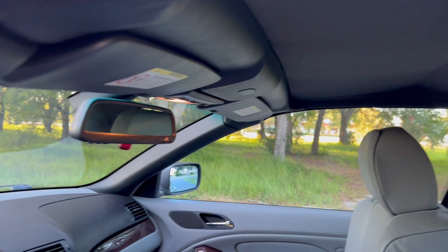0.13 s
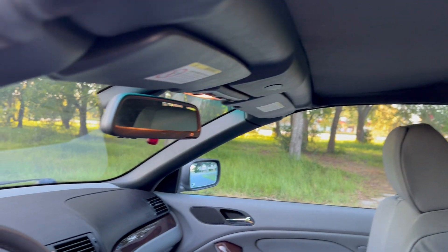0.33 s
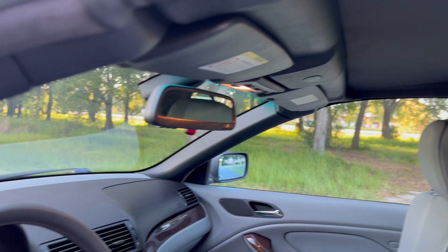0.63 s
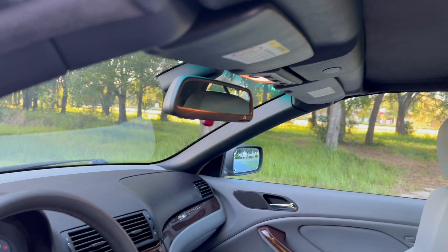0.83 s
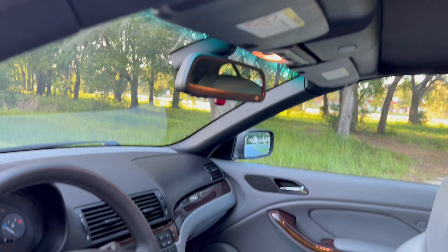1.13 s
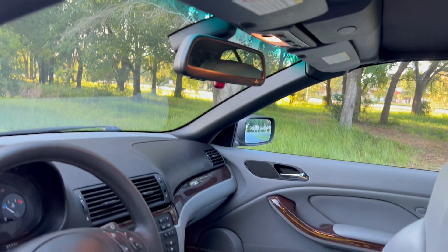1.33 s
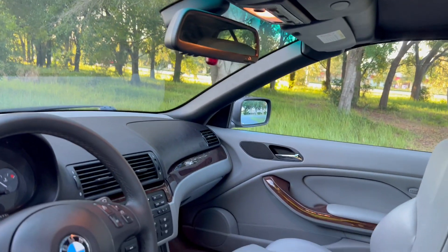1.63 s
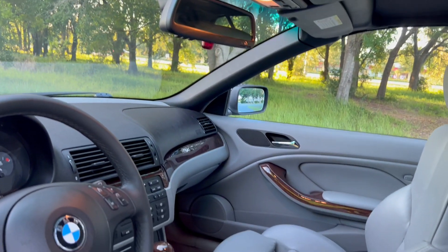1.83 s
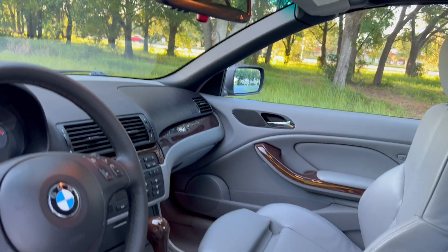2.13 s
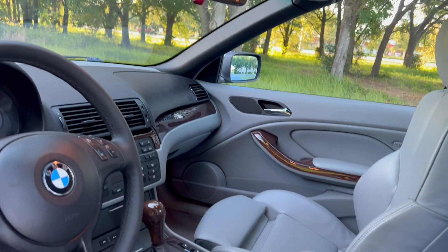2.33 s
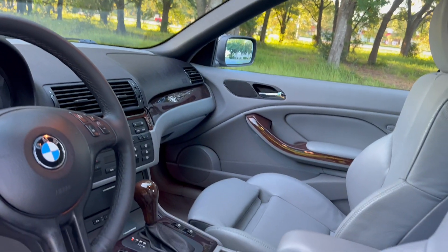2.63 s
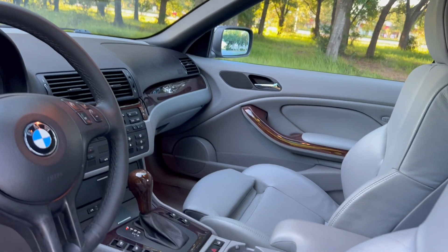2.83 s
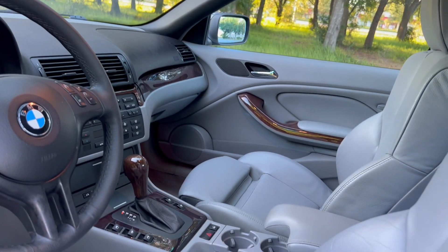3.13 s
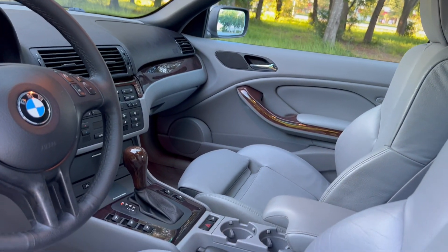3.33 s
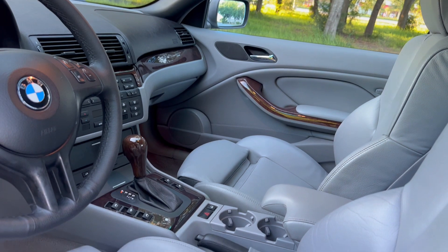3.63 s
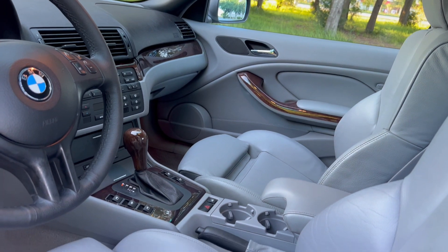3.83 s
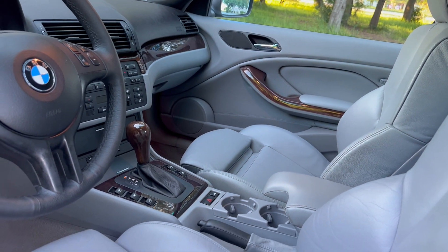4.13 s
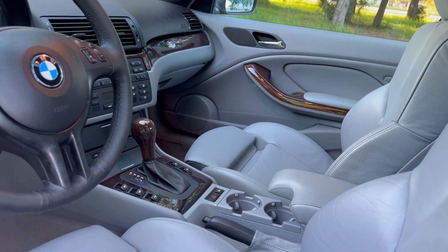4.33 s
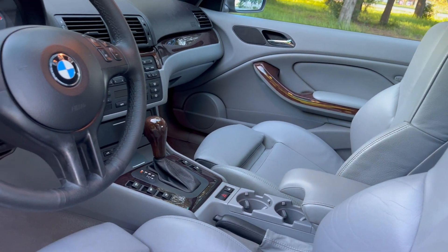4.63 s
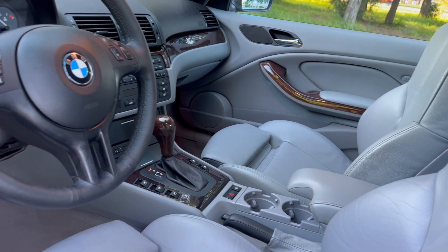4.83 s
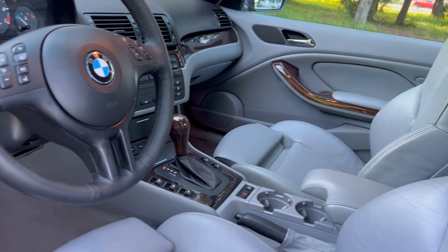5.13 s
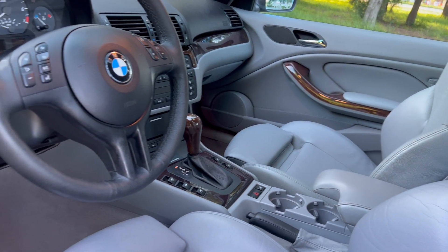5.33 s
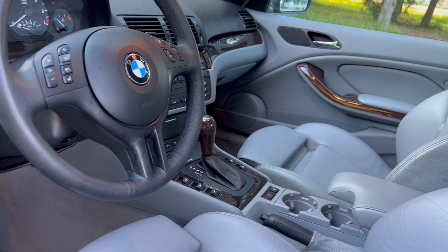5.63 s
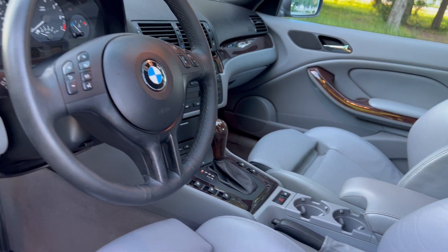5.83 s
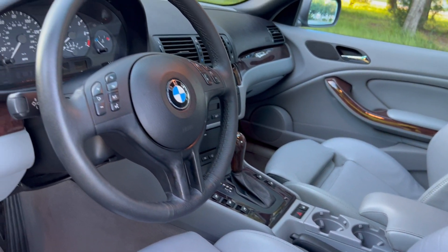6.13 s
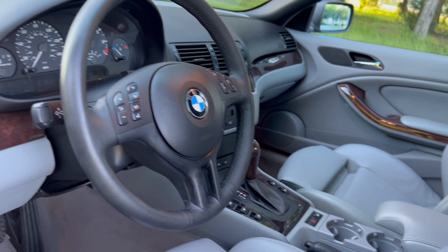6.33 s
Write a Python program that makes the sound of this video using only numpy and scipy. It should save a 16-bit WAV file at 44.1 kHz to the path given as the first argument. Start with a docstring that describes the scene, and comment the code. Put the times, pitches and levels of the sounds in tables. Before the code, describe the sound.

A handheld stereo microphone moves from a car's open door into the cabin. Wind first thumps on it in low lumps, with one dull falling jolt near one second. The engine idles steadily, its hum growing to a deep boom, over soft rumble and buzzing panels. Cicadas shimmer outside under trees. Faint plastic ticks come midway, and a last gust hits at the end.

```python
"""A car idles under trees with its door open; a handheld microphone starts at the door, cicadas singing outside.
In the first second and a half air buffets the ports in lumps of low noise, with one jolt that falls in pitch.
Trim ticks faintly as rings from 2.5 s; at about 3.4 s one near cicada, a filtered click cycle, gives way to another.
Deeper in the cabin the engine orders, sines on a slowing cycle, boom over coloured rumble and buzzing panels.
Just before the end one more gust strikes the ports."""
import sys
import numpy as np
from scipy import signal
from scipy.fft import rfft, irfft
from scipy.io import wavfile
from scipy.ndimage import uniform_filter1d, map_coordinates

SR = 44100
rng = np.random.default_rng(int(sys.argv[2]) if len(sys.argv) > 2 else 0)


def invert_db(level):
    """Linear amplitude ratio for a level in decibels (20 dB per decade), elementwise."""
    return 10 ** (np.asarray(level, dtype=float) / 20)


def inscribe(sig):
    """Save sig as 16-bit PCM at rate SR to the path in sys.argv[1].

    A 1-D sig is mono; a 2-D sig holds one channel per row.
    Samples are clipped to [-1, 1] before scaling.
    """
    pcm = np.round(np.clip(np.atleast_2d(sig).T, -1, 1) * 32767)
    wavfile.write(sys.argv[1], SR, pcm.astype(np.int16))


N = 286209
TIME = np.arange(N) / SR
HZ = np.maximum(np.fft.rfftfreq(N + 1, 1 / SR), 1)

# far cicadas: t/s, level/dB of the low, high and top bands (before panning)
CHORUS_LEVELS = [(0, -63, -55, -56.5), (.75, -62, -53.5, -53.5), (1.15, -62.5, -54.5, -56.5),
                 (2.7, -62.5, -57.5, -64), (3.63, -57, -56.5, -63), (4.3, -59, -56, -63.5),
                 (4.8, -57, -54.5, -61), (6.49, -57.5, -52, -57)]
# colours of the three bands of far song: f/Hz, relative level/dB per Hz
LOW_SONG = [(3800, -12.5), (4300, -10), (4800, 0), (5300, -2.5), (5700, -13), (6200, -8.5), (7200, -15),
            (8000, -26.5)]
HIGH_SONG = [(7000, -29), (7700, -14.5), (8600, -0.5), (9600, 2.5), (10300, 1), (10800, -16), (11500, -42)]
TOP_SONG = [(10000, -30), (10700, -2), (12000, -2), (12800, -8), (14500, 1.5), (15300, -5), (16000, -34)]
# two near cicadas: t/s, 33rd harmonic of the click cycle f/Hz, level/dB of lower and upper song (before the paths)
NEAR_CICADAS = [
    [(0, 5045, -65, -58), (.35, 5035, -66, -56), (.75, 5058, -57.5, -53), (1.25, 5056, -69, -61),
     (1.9, 5052, -70, -65), (2.35, 5040, -65.5, -67), (2.8, 4965, -64.5, -74), (3.3, 4945, -67.5, -76)],
    [(3.5, 5230, -64.5, -70), (3.7, 5190, -61, -68), (4.3, 5178, -62, -71), (4.65, 5190, -68, -74),
     (4.9, 5205, -62.5, -70), (5.5, 5250, -62.5, -60), (6.49, 5268, -65, -60)],
]
# resonances of a cicada's body, lower and upper song: f/Hz, width/Hz, relative level/dB
LOWER_BODY = [(5200, 600, 0), (6150, 300, -16)]
UPPER_BODY = [(9800, 1300, 0), (11700, 1200, -9), (13500, 1200, -10), (14500, 800, -14)]
# gusts of air on the ports: start t/s, length/s, level/dB while held
GUSTS = [(.02, .03, -41), (0.085, 0.38, -33.5), (0.588, .17, -27.5), (0.824, 0.19, -23.5),
         (1.124, 0.091, -29.5), (1.22, 0.19, -39), (6.41, .1, -22.5)]
GUST_RISE_S, GUST_FALL_S = 0.027, 0.029   # linear rise, time constant of the fall
# colour of the buffeting: f/Hz, relative level/dB per Hz
BUFFET_COLOUR = [(20, -37), (32, -35), (48, 7), (75, 2), (150, -14.5), (260, -17.5), (500, -62)]
# one jolt on the ports: level/dB before rise and decay, from f/Hz, towards f/Hz, decay/s
JOLT = (-14.5, 210, 60, 0.02)
JOLT_START_S = 1.1035
# faint ticks of trim: t/s, starting level/dB of the lower mode, its f/Hz, decay/s
TRIM_TICKS = [(2.506, -40, 1500, .0012), (2.652, -43, 1100, .008), (2.815, -53, 2500, .004),
              (4.6945, -45, 2900, .0015), (4.746, -46, 3200, .002)]
# place of the microphone: t/s, depth in the cabin (0-1), engine noise level/dB before the colour gains,
# left over right level/dB of the engine orders
PLACE = [(0, 0.1, -54.5, -2), (.8, 0.02, -51.5, 2), (1.6, 0.4, -53, 1), (2.6, .1, -54, 1),
         (3.5, 0.53, -51, 1.5), (4.3, 0.64, -49, .5), (4.5, 0.76, -46, 0.5), (5.2, 0.92, -45.5, 1),
         (6, 0.92, -43, 3.5), (6.49, 0.9, -44, 4)]
LAG_AT_DOOR_S, LAG_IN_CABIN_S = -0.00045, 0.00031   # how late the car reaches the left port at depth 0 and 1
# panels that buzz: f/Hz at the door, f/Hz in the cabin, corner/Hz of the noise about it,
# level/dB at the door, level/dB in the cabin (before panning)
BUZZING_PANELS = [(1099, 1330, 59, -56, -65), (967, 890, 68, -60.5, -56.5), (2454, 2600, 330, -67, -58),
                  (722, 700, 14.3, -63.5, -57.5), (1528, 1520, 20, -77.5, -64)]
# colours of the engine noise at the door and deep in the cabin: f/Hz, relative level/dB per Hz
NOISE_AT_DOOR = [(18, -33), (30, -9.5), (60, -1.5), (111, -5), (175, -5.5), (216, -13.5), (250, -14),
                 (371, -13.5), (466, -21), (887, -23.5), (1090, -19.5), (1340, -29), (2510, -35.5),
                 (3210, -42.5), (4300, -39.5), (5590, -59), (9460, -120)]
NOISE_IN_CABIN = [(18, -61), (30, -20), (60, -3.5), (102, -7.5), (128, -2.5), (158, 4), (183, -16.5),
                  (245, -24.5), (295, -12), (447, -22.5), (623, -26), (691, -26), (1370, -40.5),
                  (2510, -30), (4300, -45), (5590, -90), (9460, -120)]
DOOR_NOISE_DB, CABIN_NOISE_DB = 14, 9   # gain of each colour
# how alike the engine noise is at the two ports: f/Hz, left-right likeness (0-1)
NOISE_LIKENESS = [(60, 0.63), (200, 0.56), (400, 0.36), (600, 0), (1200, 0.035), (2400, 0), (4000, 0)]
# the idle slowly settles: t/s, engine cycles per s
IDLE_SPEED = [(0, 20.65), (.9, 20.62), (1.7, 20.25), (2.4, 20.1), (3.8, 19.93), (4.8, 19.77), (5.5, 19.47),
              (6.49, 19.3)]
# the two booming orders, in multiples of the engine cycle
LOUD_ORDERS = (8, 10)
# they swell and sink across the cabin's standing waves: t/s, level/dB of order 8, of order 10 (before panning)
LOUD_LEVELS = [(0, -44, -49), (.7, -36, -44), (1.3, -44, -44), (2, -37, -40.5), (2.5, -37.5, -41.5),
               (3.2, -31.5, -38.5), (3.65, -33, -35.5), (4.25, -26.5, -37.5), (4.7, -28, -44),
               (5.2, -23.5, -37.5), (5.45, -23.5, -38.5), (5.7, -22.5, -36), (6, -26.5, -40.5),
               (6.25, -23.5, -37), (6.49, -23.5, -49)]
# the fainter orders, in multiples of the engine cycle
FAINT_ORDERS = (3, 5, 7, 13, 15, 16, 18, 21, 36)
# one row per faint order: level/dB at depth 0, level/dB at depth 1 (before swells and panning)
FAINT_LEVELS = [(-41.5, -38.5), (-46.5, -54), (-52, -56.5), (-53, -63), (-55, -51.5), (-61.5, -52),
                (-56.5, -54), (-80, -66.5), (-70, -58.5)]
# loud spots of an order's standing wave: middle t/s, half length/s, order, added level/dB
SWELLS = [(1.3, 0.22, 15, 6.5), (2.414, 0.29, 18, 9), (2.4, 0.14, 36, 9), (3.5, 0.23, 18, 7.5),
          (3.3, 0.34, 3, 3), (4.5, 0.16, 36, 9), (5.195, 0.21, 15, 7.5), (5.194, .3, 18, 1.5),
          (5.803, 0.22, 18, 8.5), (6, 0.8, 15, 5.5), (6.2, 0.48, 13, 16), (6.148, .2, 21, 17)]


def rms_one(x):
    """Scale to rms 1."""
    return x / np.sqrt(np.mean(x ** 2) + 1e-20)


def in_time(rows):
    """Columns of a table in t/s, read at every sample."""
    s, *columns = np.transpose(rows)
    return [np.interp(TIME, s, column) for column in columns]


def at_hz(points, hz):
    """Read a spectrum on a log-frequency axis."""
    point_hz, value = np.transpose(points)
    return np.interp(np.log(hz), np.log(point_hz), value)


def drift(rate):
    """Slow chance of spread 1: noise through two poles with their corner at rate/Hz, run every 40 samples."""
    r = np.exp(-80 * np.pi * rate / SR)
    white = rng.standard_normal(N // 40 + 2002)
    slow = rms_one(signal.lfilter([1], [1, -2 * r, r * r], white)[2000:])
    return np.interp(np.arange(N) / 40, np.arange(len(slow)), slow)


def noise(spectrum, alike):
    """Stereo noise of a given colour and left-right likeness, rms 1."""
    colour = invert_db(at_hz([(0.72, -150)] + list(spectrum) + [(SR, -150)], HZ))
    mid, side = rfft(rng.standard_normal((2, N + 1))) * colour
    alike = np.clip(alike, -1, 1)
    ports = np.sqrt(1 + alike) * mid + np.sqrt(1 - alike) * side * [[1], [-1]]
    return rms_one(irfft(ports, N + 1)[:, :N])


def panned(x, pan_db):
    """Raise the left channel over the right by pan_db, half of it on each."""
    return x * invert_db(np.array([[.5], [-.5]]) * pan_db)


def chorus():
    """Many far cicadas blur into bands of noise; the low band comes mostly from the left."""
    low_db, high_db, top_db = in_time(CHORUS_LEVELS)
    low = panned(invert_db(low_db + 0.91 * drift(19.0)) * noise(LOW_SONG, 0.085), 12.4)
    high = invert_db(high_db + 1.1 * drift(4.6)) * noise(HIGH_SONG, 0.033)
    top = invert_db(top_db) * noise(TOP_SONG, 0.24)
    return low + high + top


def click_pair(modes, second_drum, size=8192):
    """One cycle: two drums click into the body in turn, the second a tenth of a millisecond past half way."""
    cycle_hz = 154.0
    hz = np.arange(size // 2 + 1) * cycle_hz
    body = sum(invert_db(db) / (1 + 2j * (hz - mode_hz) / width) ** 2 for mode_hz, width, db in modes)
    late_click = second_drum * np.exp(-2j * np.pi * hz * (.5 / cycle_hz + 1e-4))
    return rms_one(irfft(body * (1 + late_click) * (hz < 16000), size))


def cicada(rows):
    """The click cycle arrives over paths through moving leaves that swell, fade and waver: overtones flicker."""
    harmonic_hz, lower_db, upper_db = in_time(rows)
    singing = (TIME >= rows[0][0]) & (TIME <= rows[-1][0])
    singing = uniform_filter1d(singing * 1., size=4000)   # soft start and end
    cycle = np.cumsum(harmonic_hz / 33 * (1 + .0008 * drift(8.0))) / SR
    # each path favours the two drums differently: share of the second drum, left and right share
    paths = (
        (1.0, [[1.0], [0.24]]),
        (0.97, [[0.1], [0.4]]),
        (0.096, [[0.16], [0.17]]),
        (0.35, [[0.58], [-0.25]]),
    )
    out = 0
    for modes, level_db, pan_db in ((LOWER_BODY, lower_db, 9.0), (UPPER_BODY, upper_db, 0)):
        for second_drum, side in paths:
            shape = click_pair(modes, second_drum)
            path_cycle = cycle + rng.random() + .003 * drift(3.0)
            heard = np.interp(path_cycle % 1 * len(shape), np.arange(len(shape)), shape)
            level = singing * invert_db(level_db + 2.5 * drift(3.1))
            out = out + panned(level * heard, pan_db) * side
    return out


def gusts():
    """Every gust rises, holds and dies away by the same rule."""
    level = 0
    for start_s, length_s, db in GUSTS:
        rise = np.clip((TIME - start_s) / GUST_RISE_S, 0, 1)
        fall = np.exp(-np.maximum(TIME - start_s - length_s, 0) / GUST_FALL_S)
        level = level + invert_db(db) * rise * fall
    return level


def jolt():
    """A decaying sine whose pitch falls as it dies."""
    level_db, from_hz, to_hz, decay_s = JOLT
    t = np.maximum(TIME - JOLT_START_S, 0)
    hz = (t > 0) * (to_hz + (from_hz - to_hz) * np.exp(-t / 0.017))
    level = invert_db(level_db) * (1 - np.exp(-t / 0.0026)) * np.exp(-t / decay_s)
    return level * np.sin(2 * np.pi * np.cumsum(hz) / SR)


def buffet():
    """Lumpy low noise while air sweeps the microphone ports, and one jolt."""
    return gusts() * noise(BUFFET_COLOUR, 0.72) + jolt()


def ticks():
    """Short plastic rings of two decaying modes, the second stronger and 1.15 times as high."""
    out = np.zeros(N)
    for start_s, level_db, hz, decay_s in TRIM_TICKS:
        t = np.maximum(TIME - start_s, 0)
        modes = np.sin(2 * np.pi * hz * t) + 2.1 * np.sin(2 * np.pi * 1.15 * hz * t)
        out += invert_db(level_db) * np.exp(-t / decay_s) * modes
    return out


def panels(depth):
    """Noise rings in each panel resonance in uneven lumps; the resonance heard shifts with the place."""
    out = 0
    for door_hz, cabin_hz, width, door_db, cabin_db in BUZZING_PANELS:
        phase = 2 * np.pi * np.cumsum(door_hz + (cabin_hz - door_hz) * depth) / SR
        # one ring common to both ports and one for each
        shared, left, right = (drift(width) * np.cos(phase) + drift(width) * np.sin(phase) for _ in range(3))
        lumps_db = 2.87 * drift(6.4) + 0.5 * drift(1.3)
        level = invert_db(door_db + (cabin_db - door_db) * depth + lumps_db)
        out = out + level * (0.55 * shared + 0.86 * np.array([left, right]))
    return panned(out, 2.3)


def rumble(depth, level_db):
    """The colour of the engine noise turns from that at the door to that of the cabin."""
    alike = at_hz(NOISE_LIKENESS, HZ)
    door = invert_db(DOOR_NOISE_DB) * np.sqrt(1 - depth) * noise(NOISE_AT_DOOR, alike)
    cabin = invert_db(CABIN_NOISE_DB) * np.sqrt(depth) * noise(NOISE_IN_CABIN, alike)
    return panned(invert_db(level_db + 0.71 * drift(11.0)) * (door + cabin), 1.7)


def swell(order):
    """Added level/dB of one order: a bell-shaped rise and fall for each loud spot of its standing wave."""
    return sum(db * np.exp(-((TIME - middle_s) / half_s) ** 2)
               for middle_s, half_s, k, db in SWELLS if round(k) == order)


def engine(depth):
    """Each order is a sine on the engine cycle; the high ones tremble more in phase and slow level."""
    phase = 2 * np.pi * np.cumsum(in_time(IDLE_SPEED)[0]) / SR
    levels_db = in_time(LOUD_LEVELS)
    for order, (door_db, cabin_db) in zip(FAINT_ORDERS, FAINT_LEVELS):
        levels_db.append(door_db + (cabin_db - door_db) * depth ** 2 + swell(order))
    out = 0
    for order, level_db in zip([*LOUD_ORDERS, *FAINT_ORDERS], levels_db):
        tremble_db = 0.076 * order * drift(0.74) + .5 * drift(17.0)
        order_phase = order * (phase + 0.008 * drift(3.0)) + rng.uniform(0, 2 * np.pi)
        out = out + np.sqrt(2) * invert_db(level_db + tremble_db) * np.sin(order_phase)
    return out


def scene():
    """All sources at the two microphone ports."""
    depth, noise_db, pan_db = in_time(PLACE)
    outside = chorus() + sum(cicada(rows) for rows in NEAR_CICADAS)
    car = ticks() + panels(depth) + rumble(depth, noise_db) + panned(engine(depth), pan_db)
    left, right = car
    # as the microphone turns, the car sound first favours the left port in time, then the right
    lag = (LAG_AT_DOOR_S + (LAG_IN_CABIN_S - LAG_AT_DOOR_S) * depth ** 2) * SR
    left = map_coordinates(left, [np.arange(N) - lag], order=3, mode="nearest")
    return outside + buffet() + np.array([left, right])


def roll_off(x):
    """The treble ends steeply here."""
    return signal.sosfilt(signal.butter(12, 15680, fs=SR, output="sos"), x)


def record(dry):
    """In the treble both channels carry one port, the left late and turned over."""
    one_port_hz, port_lag_s = 8200, .00029
    left, right = rfft(dry, N + 1)
    shared = 1 / (1 + (one_port_hz / HZ) ** 14)   # power share of the left port in the right channel
    early_left = left * np.exp(2j * np.pi * HZ * port_lag_s)
    right = np.sqrt(1 - shared) * right - np.sqrt(shared) * early_left
    mix = irfft(np.array([left, right]), N + 1)[:, :N]
    return roll_off(mix)


dry = scene()
out = record(dry)
inscribe(out)
```